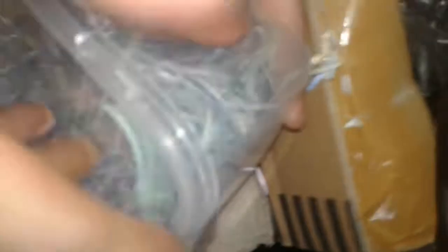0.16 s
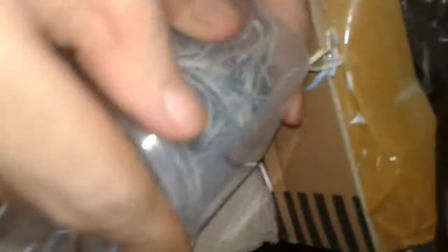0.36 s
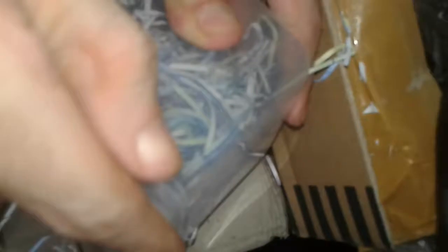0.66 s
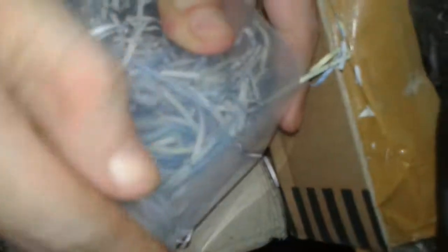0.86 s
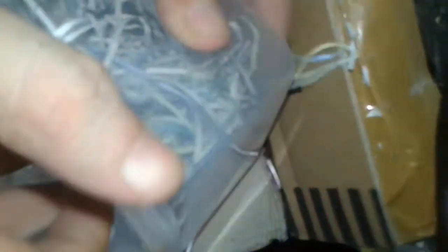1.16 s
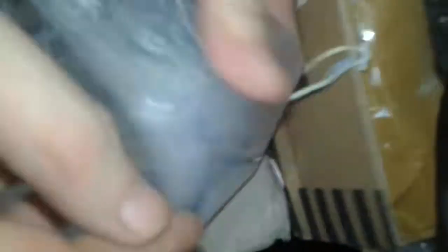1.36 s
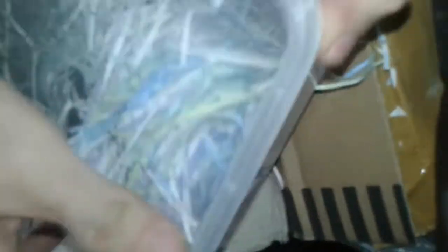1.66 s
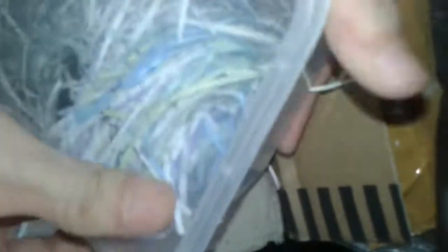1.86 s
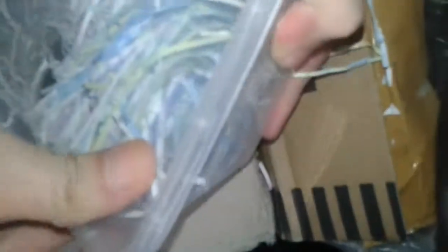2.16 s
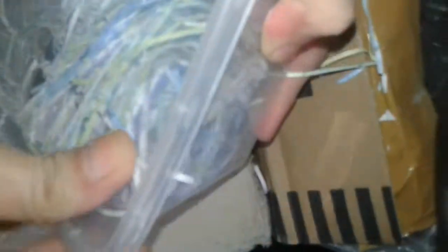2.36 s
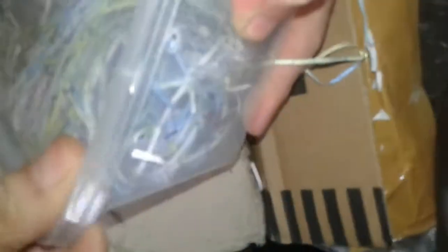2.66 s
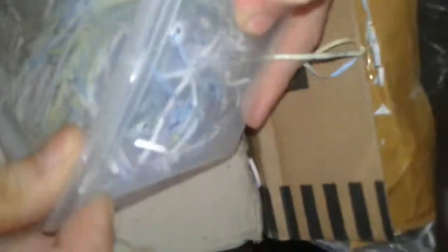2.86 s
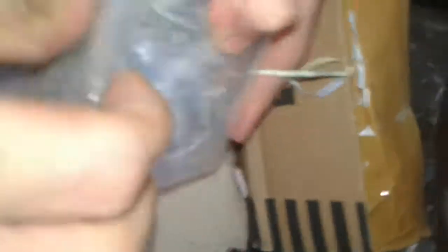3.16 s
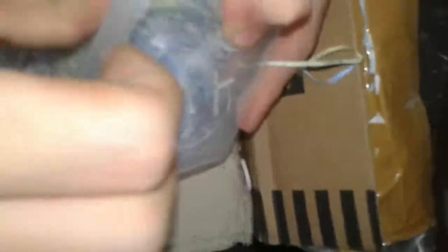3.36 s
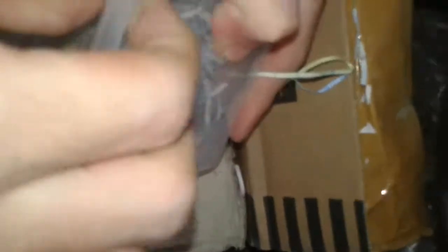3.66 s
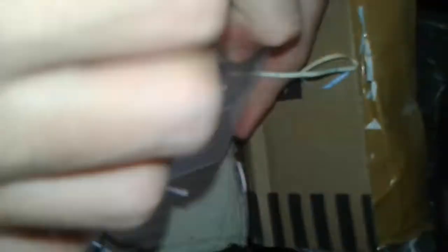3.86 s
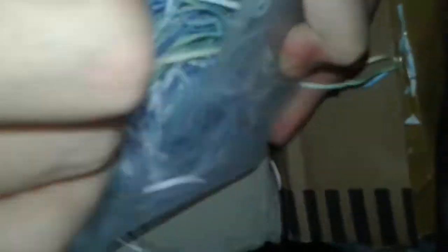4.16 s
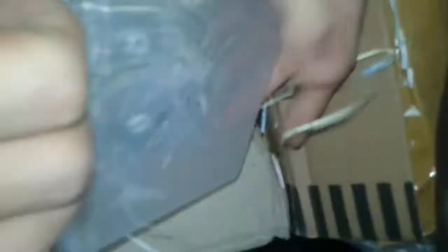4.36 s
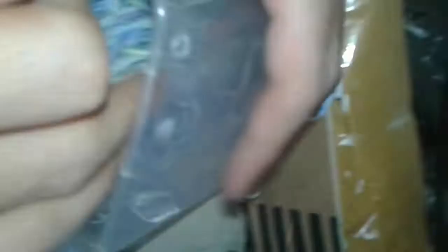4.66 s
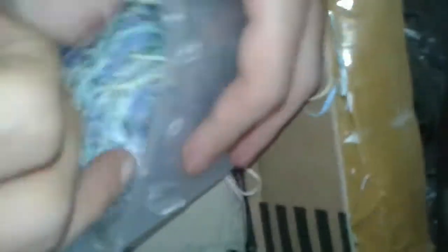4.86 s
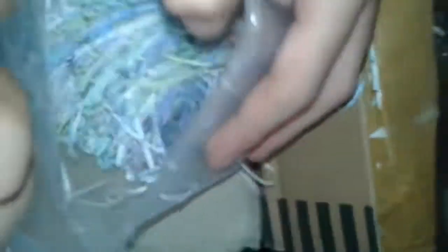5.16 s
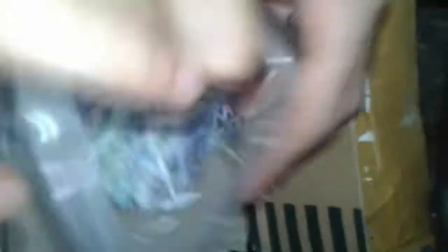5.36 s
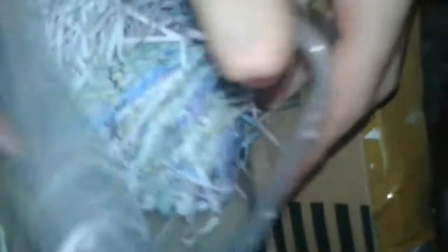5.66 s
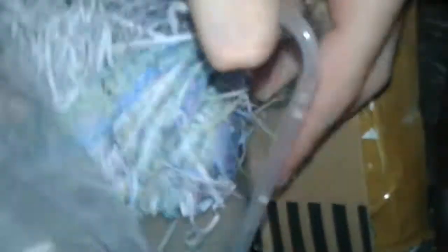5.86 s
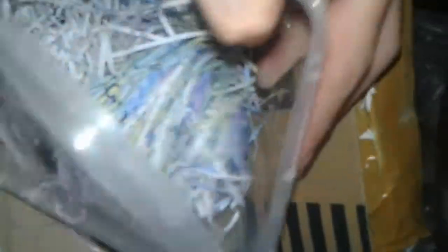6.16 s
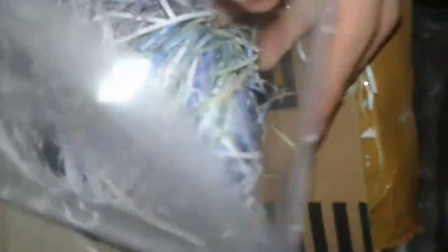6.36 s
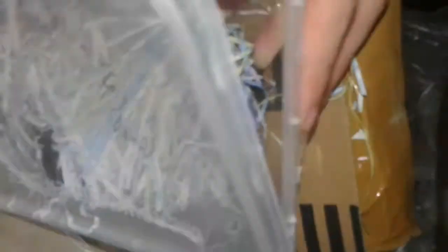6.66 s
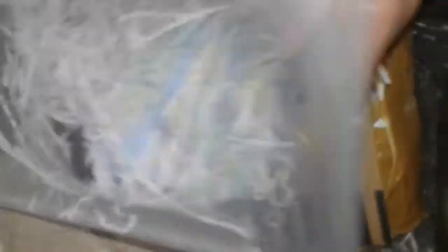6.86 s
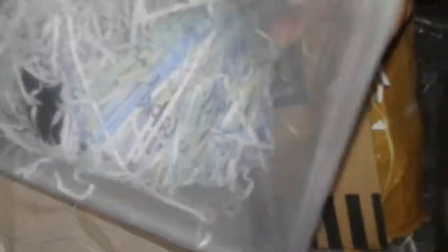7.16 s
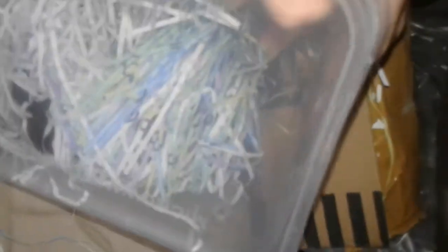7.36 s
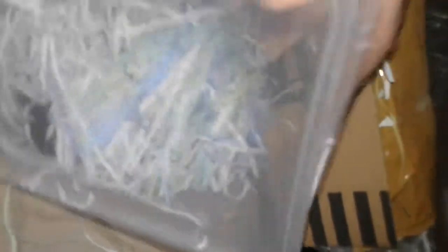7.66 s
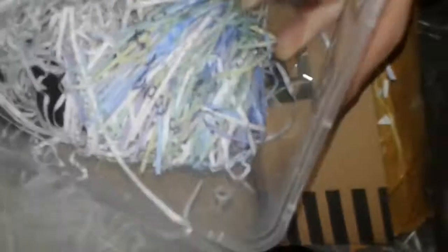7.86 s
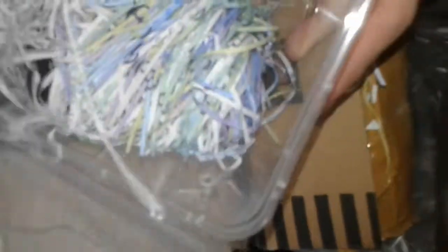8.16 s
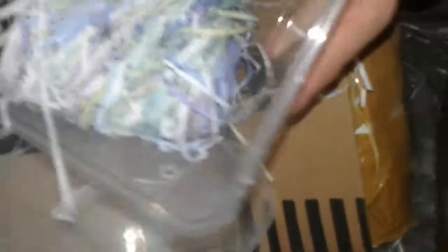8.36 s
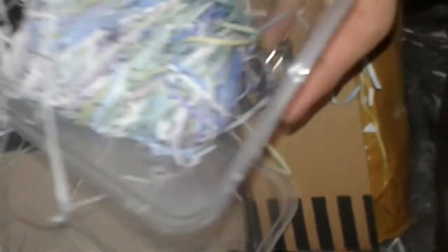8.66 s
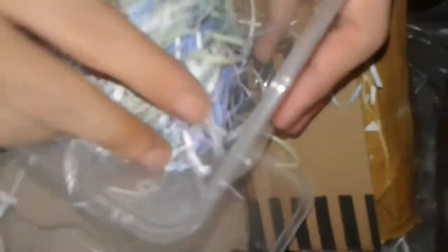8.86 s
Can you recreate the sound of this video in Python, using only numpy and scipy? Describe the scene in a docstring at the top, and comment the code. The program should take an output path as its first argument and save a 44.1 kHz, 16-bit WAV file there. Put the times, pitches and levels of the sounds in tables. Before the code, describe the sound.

Irregular plastic snaps and crackles, with brief papery rustles and dull handling bumps, as fingers rummage in a flimsy container of paper strips.

```python
"""Thin plastic tub of shredded paper, pressed, turned and rummaged by hand close to a phone in a small room.
Walls and lid buckle: each snap sums a panel swing, dispersed cracks ringing the upper wall modes, and a low thump.
Fingers and paper strips rustle: coloured grains and hiss, gated by the hand strokes.
The room answers both with reflections and a tail; band-limited handling rumble and steady air noise lie under."""
import sys
import numpy as np
from scipy import signal
from scipy.fft import rfft, irfft
from scipy.io import wavfile
from scipy.ndimage import uniform_filter1d

SR = 44100
rng = np.random.default_rng(int(sys.argv[2]) if len(sys.argv) > 2 else 0)


def materialize(psi):
    """Save the field psi as 16-bit PCM at rate SR to the path in sys.argv[1].

    A 1-D psi becomes a single channel; in a 2-D psi each row is a channel.
    """
    bounded = np.clip(np.atleast_2d(psi).T, -1, 1)
    quanta = np.round(bounded * 32767).astype(np.int16)
    wavfile.write(sys.argv[1], SR, quanta)


N = 397341  # samples


def undb(db):
    """Amplitude factor of a level in dB."""
    return 10 ** (np.asarray(db) / 20)


def unit(x):
    """Scale to an RMS of 1."""
    return x / np.sqrt(np.mean(x ** 2))


def gains(table, size):
    """Gain of a (frequency [Hz], level [dB]) table on the bins of a transform."""
    table_hz, table_db = np.transpose(table)
    bin_hz = np.arange(size // 2 + 1) * SR / size
    bin_db = np.interp(np.log(bin_hz + 1), np.log(table_hz), table_db, table_db[0] - 37, table_db[-1])
    return undb(bin_db)


def colour(x, table):
    """Causal minimum-phase filter with the table's gains, from the folded cepstrum."""
    cepstrum = irfft(np.log(gains(table, size=2048)))
    cepstrum[1:1024] *= 2
    cepstrum[1025:] = 0
    impulse = irfft(np.exp(rfft(cepstrum)))
    return signal.oaconvolve(x, impulse)[:len(x)]


def band(x, lo_hz, hi_hz):
    """Butterworth band-pass."""
    edges_hz = [lo_hz, min(hi_hz, .45 * SR)]
    return signal.sosfilt(signal.butter(2, edges_hz, "band", fs=SR, output="sos"), x)


def ring(x, hz, width_hz):
    """One resonant mode; a narrower width rings longer."""
    return signal.lfilter(*signal.iirpeak(hz, hz / width_hz, SR), x)


def walk(rate_hz):
    """Random levels held 1 / rate_hz s and slewed; RMS 1."""
    hold = int(SR / rate_hz)
    steps = np.repeat(rng.standard_normal(N // hold + 1), hold)
    return unit(uniform_filter1d(steps, hold)[:N])


def grains(per_s, spread_db, hiss):
    """Tiny clicks of uneven but bounded size over a share of plain hiss."""
    size_db = spread_db * np.minimum(rng.exponential(size=N), 4)
    hits = rng.random(N) < per_s / SR
    clicks = unit(hits * undb(size_db) * rng.standard_normal(N))
    return clicks + hiss * rng.standard_normal(N)


def crackle(lo_hz, count, per_s, spread_db, hiss):
    """Independent grains in each of count octaves above lo_hz."""
    edges_hz = lo_hz * 2 ** np.arange(count + 1.)
    return sum(band(grains(per_s, spread_db, hiss), lo, hi) for lo, hi in zip(edges_hz, edges_hz[1:]))


def bursts(peak_s, peak_db, fade_s, rise_s):
    """Gain of overlapping bursts, linear in dB either side of the peak; powers add."""
    t = np.arange(0, N + 64, 64) / SR  # control rate: every 64 samples
    late_s = t - np.array(peak_s)[:, None]
    drop_db = 20 * np.where(late_s > 0, late_s / np.array(fade_s)[:, None], -late_s / rise_s)
    level_db = np.array(peak_db)[:, None] - drop_db
    gain = np.sqrt(np.sum(undb(level_db) ** 2, axis=0))
    return np.interp(np.arange(N) / SR, t, gain)


def swell(t, peak_s, order=2):
    """Rise to 1 at peak_s, then a fall; a higher order is rounder."""
    return (t / peak_s * np.exp(1 - t / peak_s)) ** order


def scatter(chance, ms):
    """Click whose frequencies arrive at scattered times, as bending waves do; its spectrum stays even."""
    nodes = np.arange(len(chance))
    delay_s = np.interp(np.linspace(0, len(chance) - 1, 1025), nodes, chance) * ms / 1000
    phase = -2 * np.pi * np.cumsum(delay_s) * SR / 2048  # group delay integrated over the bins
    return irfft(np.exp(1j * phase))


# Air noise spectrum: (frequency [Hz], relative density [dB])
AIR_SPECTRUM = [(15, 11), (25, -15), (43, -17), (99, 11), (195, -22.5), (516, -9), (734, -16), (2550, -19),
                (4870, -22), (8360, -28), (14800, -27), (16000, -27)]
AIR_DB = -65


def air():
    """Steady room noise and microphone hiss, wavering 1 dB RMS."""
    noise = unit(colour(rng.standard_normal(N), AIR_SPECTRUM))
    return noise * undb(AIR_DB + walk(5.2))


# Jolts of the held tub: (peak time [s], rumble level [dB], fade by 20 dB [s])
TUB_JOLTS = [(0.48, -56, .2), (0.75, -62, 1.1), (1.18, -54, .15), (1.34, -52, .15), (1.53, -55, .3),
             (1.63, -54, .3), (2.1, -60, .8), (3.84, -58, .5), (4.27, -47, .2), (4.4, -50, .5),
             (5.07, -46, .09), (5.22, -53.5, .1), (5.5, -56, 1.2), (6.73, -54, .09), (7.53, -41.5, .14),
             (7.78, -43, .12), (7.9, -57, .6), (8.215, -46, .12), (8.36, -48, .3), (8.43, -46, .35),
             (8.9, -62, .6)]
JOLT_RISE_S, HOLD_DB = .05, -68  # climb of the last 20 dB; rumble of plain holding


def rumble():
    """The held tub passes low handling noise to the phone, louder at each jolt."""
    gain = np.hypot(bursts(*np.transpose(TUB_JOLTS), JOLT_RISE_S), undb(HOLD_DB))
    noise = unit(band(band(rng.standard_normal(N), 80, 230), 40, 330))
    return noise * gain * undb(1.5 * walk(14.0))


# Hand strokes: (peak time [s], wall rub level [dB], paper rustle level [dB], fade by 20 dB [s])
HAND_STROKES = [(0.065, -63, -88, .16), (0.7, -71, -79, .9), (1.135, -40.5, -53, .09),
                (1.35, -52, -63, .12), (1.47, -56, -65, .15), (1.55, -48, -53, .3), (1.626, -53, -59, .12),
                (1.79, -56, -69, .07), (1.845, -56, -67, .06), (1.93, -56, -66, .15), (2.025, -52, -57, .4),
                (2.095, -49, -52.5, .16), (2.245, -53, -64, .17), (2.494, -66, -69, .2),
                (2.71, -67, -74, .6), (2.973, -45.5, -52.5, .06), (3.188, -61, -69, .12),
                (3.75, -64, -80, .12), (3.87, -55, -71, .5), (4.25, -52, -57, .3), (4.4, -51, -49, .2),
                (4.5, -60, -63, .35), (4.86, -64, -80, .2), (4.939, -57, -63, .12),
                (5.044, -43.5, -49.5, .28), (5.22, -54, -66, .11), (5.488, -60, -66, .2),
                (5.56, -43, -64, .08), (5.682, -56.5, -62, .07), (5.797, -56, -71, .06),
                (5.941, -67, -64, .13), (6.12, -62, -65, .15), (6.24, -67, -76, .3), (6.39, -63, -63, .4),
                (6.725, -50, -76, .06), (6.815, -55, -64, .2), (6.95, -63, -70, .3),
                (7.089, -54, -64.5, .1), (7.348, -54, -75, .07), (7.9, -58, -72, .3), (7.987, -51, -56, .1),
                (8.256, -55.5, -69, .15), (8.385, -41, -57, .14), (8.521, -57, -68, .2),
                (8.685, -60.5, -68.5, .14), (8.91, -61, -74, .6)]
# Wall rub spectrum: (frequency [Hz], relative density [dB])
RUB_SPECTRUM = [(88, -34.5), (150, -20), (354, 0), (522, -10), (735, 1), (1010, -11), (1780, -13),
                (2500, -23), (3250, -55.5), (5500, -120)]
# Paper rustle spectrum: (frequency [Hz], relative density [dB])
PAPER_SPECTRUM = [(710, -41), (1200, 0), (1470, -10), (1770, -16), (2650, -12.5), (4170, -12),
                  (12100, -29.5), (15200, -34.5), (16000, -36)]
STROKE_RISE_S = .07  # climb of the last 20 dB
RESTING_RUB_DB, RESTING_PAPER_DB = -74, -88  # fingers at rest still shift a little


def hands():
    """Fingers drag on the walls and strips crackle against each other, both in the same strokes and jerks."""
    peak_s, rub_db, paper_db, fade_s = np.transpose(HAND_STROKES)
    jerks = undb(2.5 * walk(45))
    rub = unit(colour(crackle(150., count=4, per_s=220.0, spread_db=4.0, hiss=.3), RUB_SPECTRUM))
    paper = unit(colour(crackle(1000., count=4, per_s=1100., spread_db=3.0, hiss=0.18), PAPER_SPECTRUM))
    rub_gain = np.hypot(bursts(peak_s, rub_db, fade_s, STROKE_RISE_S), undb(RESTING_RUB_DB))
    paper_gain = np.hypot(bursts(peak_s, paper_db, fade_s, STROKE_RISE_S), undb(RESTING_PAPER_DB))
    return jerks * (rub * rub_gain + paper * paper_gain)


# Wall buckles: (time [s], pop peak [dB], pop pitch [Hz], crack drive over pop [dB],
#                thump over pop [dB], thump pitch [Hz], crack tilt, - below and + above 3500 Hz [dB])
WALL_BUCKLES = [(0.085, -36, 790, -6, -1, 270, 4), (0.318, -40.5, 680, -8.5, -25.5, 444, -5),
                (0.481, -14, 727, -4, -20, 294, 3), (0.696, -13, 843, -25, -32, 284, -5),
                (0.731, -12.5, 874, -19, -51, 323, -4.5), (0.912, -12, 764, -19.5, -44, 299, -5.5),
                (1.1, -39.5, 705, -10, -21, 216, -6), (1.174, -45, 444, -13.5, -29, 431, -7),
                (1.318, -33.5, 700, -3.5, -2.5, 347, -1), (1.442, -45.5, 358, -11, -1, 285, 3),
                (1.622, -32, 705, -7.5, -6, 415, 5), (1.779, -44.5, 398, -16, 0, 277, 0),
                (1.925, -48, 335, -50, -40, 335, 0), (2.176, -39.5, 357, -2.5, -28, 353, -5),
                (2.223, -36, 760, -20, -26, 342, -15), (2.255, -34, 750, -13.5, -24, 328, 2),
                (2.316, -49, 740, -20, -15, 280, -10), (2.407, -34, 735, -11.5, -9, 340, -5),
                (2.715, -19, 1375, -6, -11, 304, -4), (2.955, -32, 810, -7, -25, 452, -5),
                (3.184, -48.5, 355, -5.5, -12, 316, -5), (3.291, -13, 1206, -6, -14.5, 300, -1),
                (3.62, -33, 850, -3.5, -30, 423, 6), (3.743, -44.5, 784, -19.5, -18, 167, 3),
                (3.853, -17.5, 367, 0, -12, 290, 4), (3.93, -19.5, 1390, -3, -13.5, 277, 7),
                (4.197, -40.5, 670, -14.5, -27, 350, 1), (4.221, -32, 694, -9.5, -24, 450, -2),
                (4.259, -32, 820, -10, -19, 144, -9), (4.387, -33, 350, -15.5, 3, 280, -4),
                (4.776, -48, 740, -7, -25, 185, 1), (4.868, -37, 690, -9.5, -18, 140, 11.5),
                (5.034, -43, 1072, 3, -2.5, 436, -4.5), (5.064, -6, 796, -5.5, -22.5, 236, 4.5),
                (5.21, -35.5, 358, -20.5, -27, 318, 14), (5.428, -37, 800, -16, -13, 132, -6.5),
                (5.502, -38.5, 413, -10, -11, 396, -2), (5.545, -25.5, 564, -13, -10, 446, -3),
                (5.664, -37, 813, -15.5, -27, 404, 8), (5.783, -46.5, 842, -17, -18, 159, -7),
                (5.882, -36.5, 799, -13.5, -2.5, 450, 3.5), (6.608, -35, 589.7, -6.5, -6.5, 161, -0.5),
                (6.715, -40.5, 640, -27.5, -1, 159, 5.5), (6.813, -38, 640, -17.5, -33, 135, -10),
                (7.075, -42, 722, -12.5, -14, 149, -7), (7.334, -44.5, 607, -16, -11.5, 369, 8),
                (7.498, -18, 748, -10, -20, 221, 10), (7.535, -10, 624, -7.5, -34, 213, -1),
                (7.575, -24, 700, -10, -25, 220, -4), (7.76, -14.5, 700, -2.5, -24, 216, 2),
                (7.973, -30, 601, -16, -8.5, 363, 3), (8.21, -26, 559, -11.5, 1.5, 418, 3),
                (8.268, -36.5, 357, -8, -14, 328, -7.5), (8.355, -29.5, 364, -17, -18, 355, -2),
                (8.38, -33.5, 476, -19, -20.5, 450, 3), (8.423, -27.5, 568, -15.5, -8.5, 228, 7.5),
                (8.498, -33, 574, -26.5, -22, 226, -7), (8.672, -44.5, 426, -13.5, -9.5, 406, 4)]
# Crack spectrum: (frequency [Hz], relative density [dB])
CRACK_SPECTRUM = [(120, -36), (200, -2.5), (867, 10.5), (1910, 2), (2650, -3), (5040, -3), (5730, -9),
                  (6400, -7.5), (9930, -20.5), (11700, -23), (16000, -37)]
# Upper wall modes: (frequency [Hz], width [Hz], relative level [dB])
WALL_MODES = [(1750, 500, 4), (2560, 49, 6.5), (3806, 33, 6), (4760, 170, -19), (6596, 51, -10.5),
              (7380, 140, 0)]
CRACK_GAIN_DB = 25.5  # on cracks and wall modes alike


def snaps(rise_ms_least=.9, rise_ms_per_db=0.1525, ring_db=-17.0, ring_db_per_ms=5.0, thump_cycles=0.81, ms=6.5):
    """Each buckle: a few cycles of the panel, a cluster of cracks that also rings the wall modes, a low thump."""
    low, crisp, tilted, rung = np.zeros((4, N + 2048))
    t = np.arange(2048) / SR
    chances = rng.random((len(WALL_BUCKLES), 2, 110))
    for (s, db, hz, crack_db, thump_db, thump_hz, tilt_db), chance in zip(WALL_BUCKLES, chances):
        # a gentle buckle leaves the panel free to swing longer and to sound its upper modes
        rise_ms = rise_ms_least + rise_ms_per_db * max(-crack_db, 0)
        start = int((s - 0.44 * rise_ms / 1000) * SR)  # the swing starts softly ahead of the crack
        at = slice(start, start + 2048)
        pop = swell(t, rise_ms / 1000, order=5) * np.sin(2 * np.pi * hz * t)
        thump = swell(t, thump_cycles / thump_hz) * np.sin(2 * np.pi * thump_hz * t)
        low[at] += undb(db) * pop
        low[at] += undb(db + thump_db) * thump
        # a sharp first tick, then the looser body of the crack
        crack = .4 * scatter(chance[0], 1) + scatter(chance[1] ** 2, ms)
        crack = undb(db + crack_db) * np.roll(crack, int(s * SR) - start)
        crisp[at] += crack * undb(-tilt_db)
        tilted[at] += crack * (undb(tilt_db) - undb(-tilt_db))
        rung[at] += crack * undb(ring_db + ring_db_per_ms * rise_ms)
    cracks = crisp + signal.lfilter(*signal.butter(1, 3500, "high", fs=SR), tilted)
    modes = sum(undb(db) * ring(rung, hz, width_hz) for hz, width_hz, db in WALL_MODES)
    bright = undb(CRACK_GAIN_DB) * (colour(cracks, CRACK_SPECTRUM) + modes)
    return band(low + bright, 70, 19000)[:N]


# Room tail bands: (centre [Hz], time to fall 60 dB [s], relative level [dB])
TAIL_BANDS = [(150, 0.17, 6), (393, 0.28, -3.5), (1070, 0.27, -8.5), (2530, 0.26, -1), (5560, 0.3, -1),
              (12700, 0.083, 10.5)]
# First reflections: (delay [ms], level [dB])
REFLECTIONS = [(6, -12), (15.3, -12.5), (17, -15), (23, -25), (37, -21.5)]


def room(x, build_ms=10.25, tail_db=-29.0):
    """Direct sound, a few reflections thin in the bass, then a tail that builds up and dies band by band."""
    t = np.arange(SR // 2) / SR
    tail = np.zeros(len(t))
    for hz, t60_s, db in TAIL_BANDS:
        noise = band(rng.standard_normal(len(t)), hz / 1.55, hz * 1.667)
        tail += undb(db - 60 * t / t60_s) * noise
    early = np.zeros(len(t))
    for (ms, db), chance in zip(REFLECTIONS, rng.random((len(REFLECTIONS), 12))):
        early[int(ms * SR / 1000):][:2048] += undb(db) * scatter(chance, 2.512)
    build = 1 - np.exp(-(t * 1000 / build_ms) ** 3)
    answer = band(early, 1000, 8200) + undb(tail_db) * tail * build
    return x + signal.oaconvolve(x, answer)[:N]


def scene():
    """Snaps and hands sound in the room; rumble and air add directly; one channel."""
    return (room(snaps() + hands()) + rumble() + air())[None]


TOP_HZ = 16200


def record(dry):
    """The phone rounds the loudest peaks and cuts the top."""
    rounded = np.tanh(dry)
    return signal.sosfilt(signal.ellip(12, .2, 95, TOP_HZ, fs=SR, output="sos"), rounded)


dry = scene()
out = record(dry)
materialize(out)
```